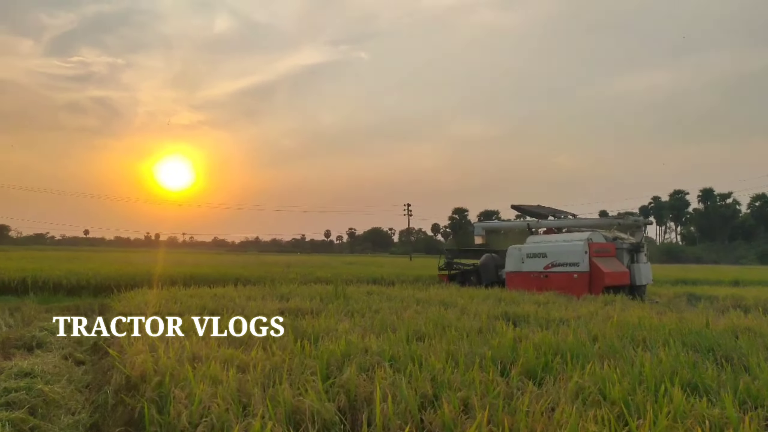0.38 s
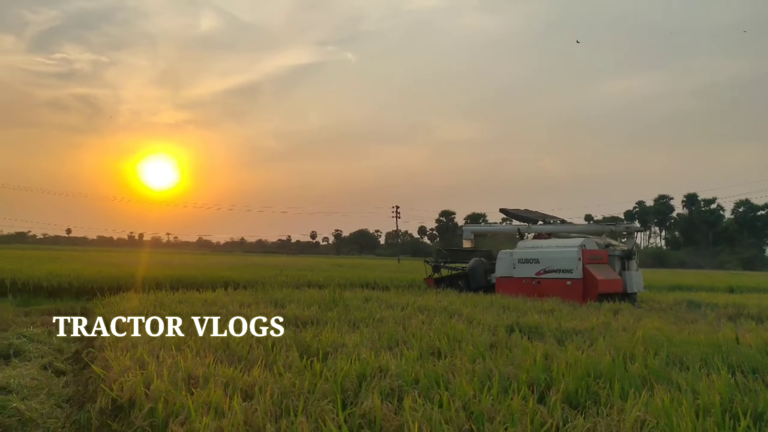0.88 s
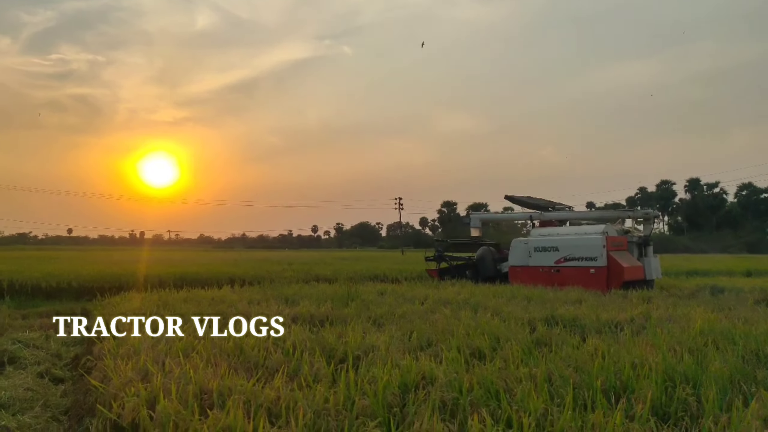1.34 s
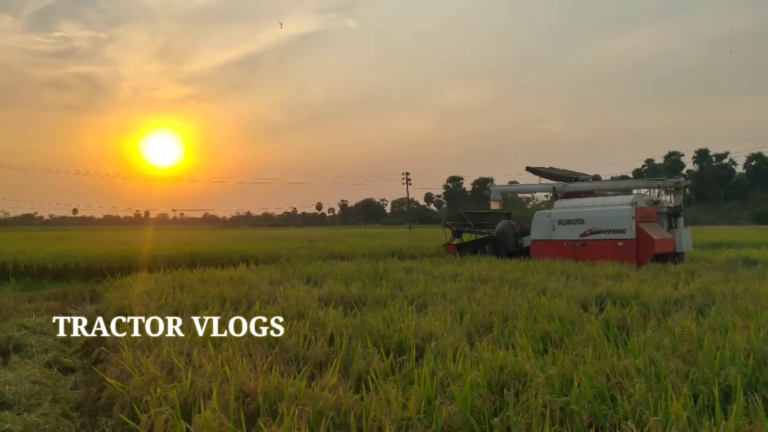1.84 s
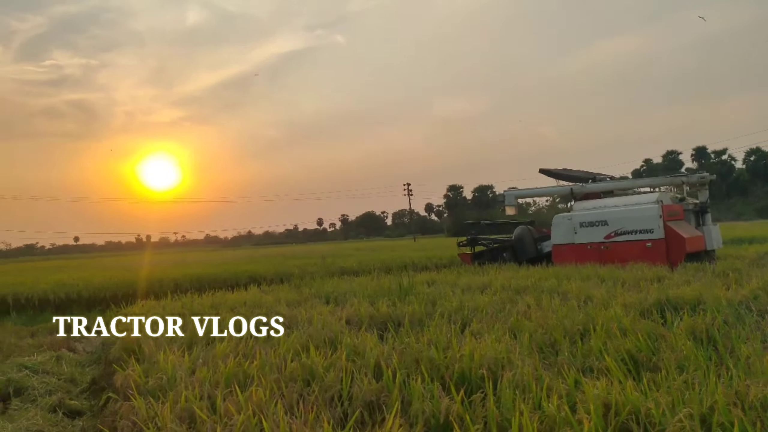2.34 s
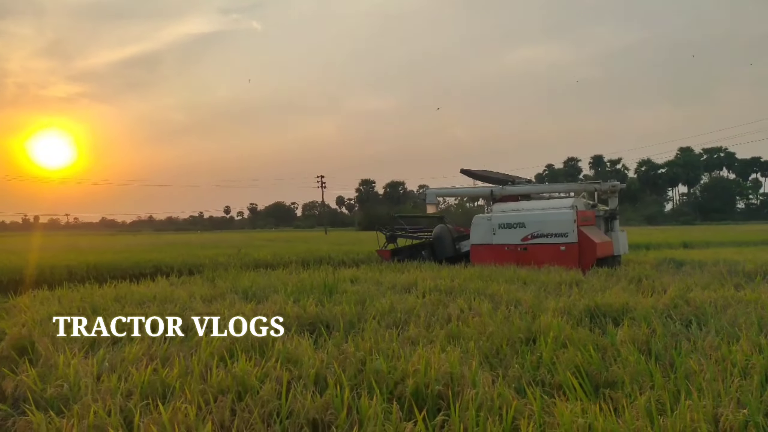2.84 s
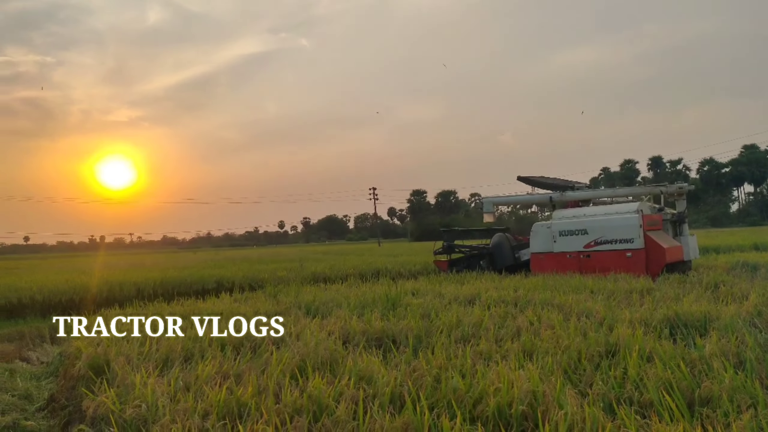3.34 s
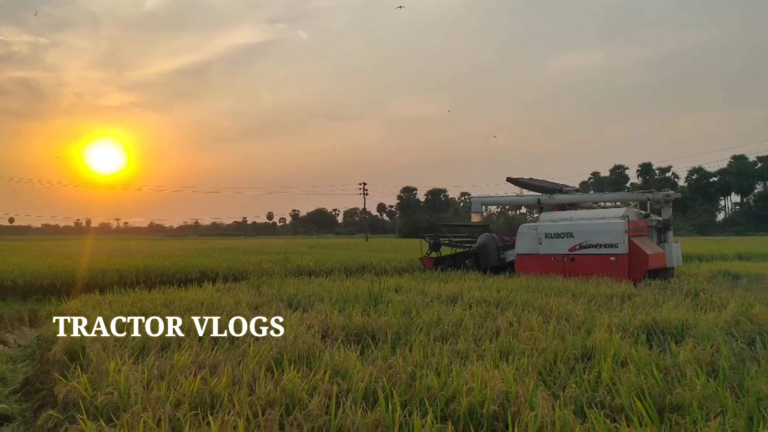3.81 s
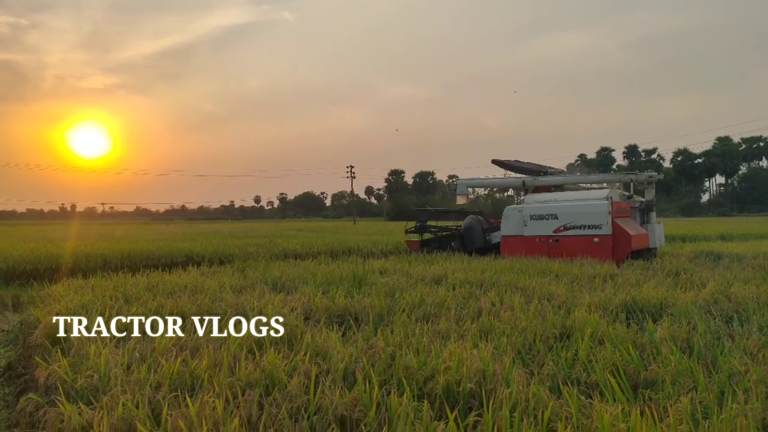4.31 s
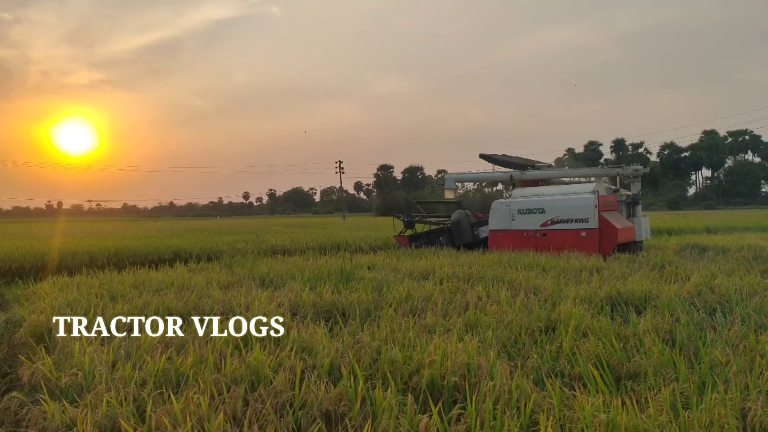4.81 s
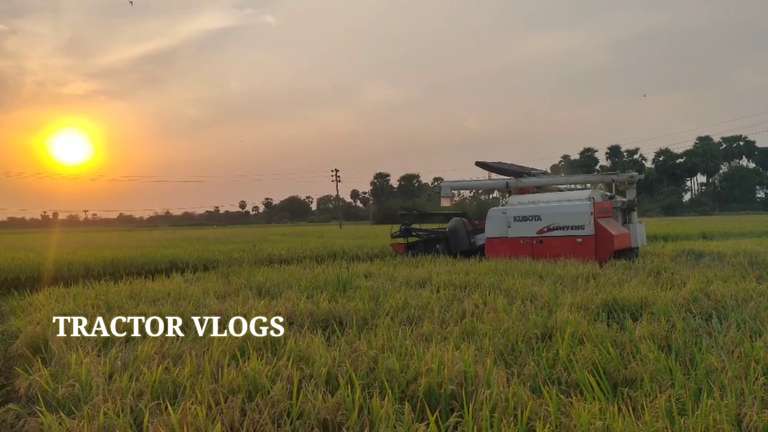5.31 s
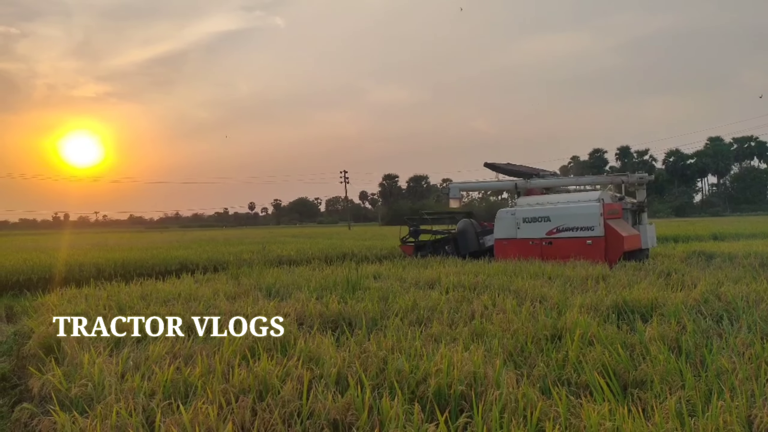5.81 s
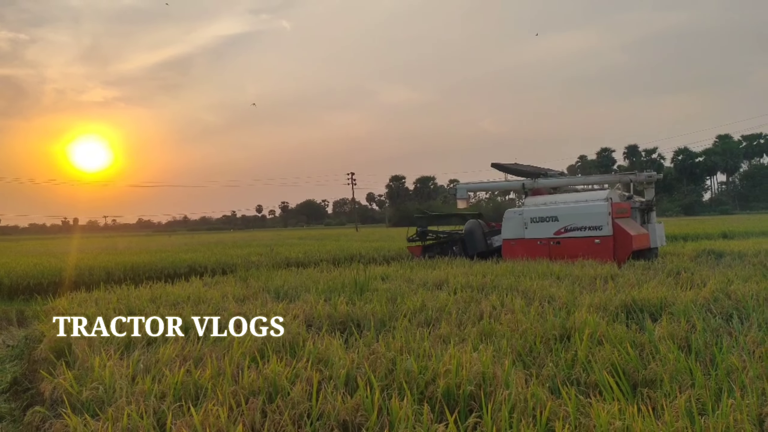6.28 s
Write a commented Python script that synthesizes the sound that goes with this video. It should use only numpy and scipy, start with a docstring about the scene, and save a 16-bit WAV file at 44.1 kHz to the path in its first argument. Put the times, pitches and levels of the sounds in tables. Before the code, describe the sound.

A combine harvester drones across a rice field, its low diesel hum beating and throbbing while dry chaff hisses on top, gradually growing fuller.

```python
"""The diesel of a tracked combine harvester, working a rice field some way off, picks up speed as it turns side-on.
Sums of cosines give its firing orders and those of the belt-driven threshing drum, so the two beat.
Shaped noise makes rumble, panel boom, drum roar, drone, fan, belt whir and buzz, throbbing with the knife;
noise spiked by ticks makes the blown chaff. Most noises reach two microphone ports directly and off the ground,
whose bounce combs the sound with slowly rising notches."""
import sys
import numpy as np
from scipy import signal
from scipy.fft import rfft, irfft, next_fast_len
from scipy.io import wavfile
from scipy.ndimage import uniform_filter1d, map_coordinates

SR = 44100
rng = np.random.default_rng(int(sys.argv[2]) if len(sys.argv) > 2 else 0)


def linear_from_db(decibels):
    """Turn decibels (scalar or array-like) into linear amplitude factors; 0 gives 1."""
    return 10 ** (np.asarray(decibels, float) / 20)


def materialize(psi):
    """Save the field psi as 16-bit PCM at rate SR to the path in sys.argv[1].

    A 1-D psi becomes a single channel; in a 2-D psi each row is a channel.
    """
    bounded = np.clip(np.atleast_2d(psi).T, -1, 1)
    quanta = np.round(bounded * 32767).astype(np.int16)
    wavfile.write(sys.argv[1], SR, quanta)


N = 282971

# Shaft speeds: start_s, firing_rate_hz, drum_lag_hz
SHAFT_SPEEDS = [(0, 92.4, 1.35), (.9, 92.5, 1.2), (1.3, 92.8, 1.0), (1.65, 94.7, 1.0), (1.95, 95.43, 1.15),
                (2.7, 95.43, 1.27), (6.42, 95.43, 1.31)]
OPPOSED_S = 4.24  # a moment when the fundamentals of drum and exhaust oppose, but for their wavering
# Exhaust orders: multiple of the firing rate, base_level_db (rms)
EXHAUST_ORDERS = [(1, -42), (2, -38), (3, -45), (4, -59)]
# Drum orders (beater, fan, two gears): multiple of the drum rate, base_level_db (rms)
DRUM_ORDERS = [(1, -36), (5, -52.5), (11, -61), (47 / 4, -58)]
# Added to the base levels: start_s, first_exhaust_db, second_exhaust_db, third_and_fourth_exhaust_db, drum_db
ORDER_CHANGES = [(0, -2, -15, -1, -15), (.3, 1.5, 5, -14, -15), (.5, 0, -11.5, -5, -13),
                 (.75, -7, 4, -7, -4), (.9, -1, -9, -6.5, -15.5), (1.15, -5, 3, -16, -5),
                 (1.35, -3, -13, -10.5, 0.5), (1.65, 0.5, 2, 2, -33), (1.9, -4.5, -5, -25, -6.5),
                 (2.15, -6, -5, 3.5, 2.5), (2.5, 1.5, -2.5, -3, -0.5), (3, -8.5, -1, -4.5, 2),
                 (3.4, -4, 3, 0.5, 1.5), (3.8, 2.5, -0.5, 0.5, -0.5), (4.6, 5.5, 0, 3.5, -1),
                 (5.3, 5, 0, 0.5, -2), (5.8, -2, 0, -4.5, 2), (6.42, 9, 2, 4, -4)]

# Slow levels before swells and throbs: start_s, rumble_db, roar_db, drone_db, fan_db, whir_db
MACHINE_LEVELS = [(0, -46, -41, -47, -46.5, -52), (.2, -41, -39, -52, -48.5, -52.5),
                  (.45, -35.5, -41.5, -44, -49, -53), (.7, -46, -40, -58, -46, -55.5),
                  (1, -40, -43, -53.5, -47.5, -49.5), (1.3, -35, -42.5, -47, -46.5, -52.5),
                  (1.65, -43, -42, -51.5, -46.5, -53), (2, -39, -41, -38.5, -45.5, -53),
                  (2.35, -36, -38.5, -42.5, -47, -52.5), (2.6, -35, -38.5, -39.5, -44.5, -51.5),
                  (2.9, -36, -42, -42, -46.5, -50.5), (3.25, -34, -39, -39, -45.5, -49.5),
                  (3.6, -34.5, -40.5, -40, -45.5, -48.5), (4.3, -34.5, -38, -42.5, -45.5, -50.5),
                  (4.8, -34.5, -38.5, -43.5, -43.5, -49), (5.7, -32, -37.5, -41.5, -44.5, -49),
                  (6.15, -38, -41.5, -46, -45.5, -53), (6.42, -34.5, -41.5, -46.5, -45.5, -52.5)]
# Panel boom and buzz before their throbs: start_s, level_db
BOOM_LEVELS = [(0.0, -47.5), (0.43, -40), (1.0, -54), (1.09, -40), (1.12, -44), (1.3, -32.5), (1.34, -46),
               (1.45, -45), (1.48, -30.5), (1.88, -48.5), (1.97, -36), (2.29, -44.5), (2.54, -33.5),
               (2.72, -45), (2.93, -31.5), (2.98, -52), (3.04, -42), (3.54, -34.5), (3.61, -48),
               (3.84, -34.5), (4.27, -43), (4.48, -30), (4.54, -43.5), (5.63, -38.5), (5.95, -44),
               (6.42, -47)]
BUZZ_LEVELS = [(0, -63), (.25, -68.5), (.8, -75), (1.5, -67), (2.3, -65.5), (3, -63.5), (3.7, -64.5),
               (4.4, -62.5), (5.1, -60), (5.8, -60.5), (6.42, -62)]
# The machine heaves, perhaps as wads of crop pass the drum: peak_s, rumble_swell_db, roar_swell_db
HEAVES = [(.4, -0.5, 2), (.72, 7, -1), (1.3, -1.5, -0.5), (1.5, 5, 2), (1.72, 5.5, 3.5), (2.1, 3, 3.5),
          (2.55, 0, 0.5), (2.898, 2.5, 5.5), (3.45, 0.5, -2), (3.7, -1, 1.5), (4, 1.5, -1), (4.15, 3, 1.5),
          (4.5, 3, 3), (4.92, 2, 2.5), (5.32, -1.5, 3.5), (5.6, -2, 1.5)]
HEAVE_SPREAD_S = 0.051  # standard deviation of a bell-shaped swell
KNIFE_HZ = 14.2  # mean stroke rate of the cutter knife

# Relative noise spectra of the machine: frequency_hz, density_db (per Hz)
RUMBLE_SPECTRUM = [(12, -51.5), (20, -22), (38, -29), (50, -21.5), (68, -10.5), (97, -5.5), (120, -2),
                   (150, -7), (175, -4), (190, -1.5), (209, -7.5), (228, -6.5), (245, -12), (270, -10.5),
                   (295, -9.5), (330, -11.5), (430, -34.5), (730, -120)]
BOOM_SPECTRUM = [(70, -120), (115, -26.5), (132, -6), (142, 1), (160, 4), (170, -1.5), (185, -23.5),
                 (300, -120)]
ROAR_SPECTRUM = [(200, -23.5), (290, -2), (340, -1.5), (400, -4.5), (450, -1), (510, -1.5), (600, -4),
                 (680, -16), (1000, -120)]
DRONE_SPECTRUM = [(400, -120), (520, -24), (600, -0.5), (660, 2.5), (740, -1), (810, -2.5), (900, -40.5),
                  (1200, -120)]
FAN_SPECTRUM = [(500, -120), (700, -12), (820, -9), (920, -4), (1030, -6), (1150, -9.5), (1300, -17.5),
                (1800, -120)]
WHIR_SPECTRUM = [(900, -120), (1150, -21.5), (1300, -1), (1700, -0.5), (2100, 0.5), (2400, -6.5),
                 (2550, -27), (3500, -120)]
BUZZ_SPECTRUM = [(1900, -120), (2300, -33), (2450, -4.5), (2550, 1.5), (2700, -3.5), (2850, -23),
                 (3500, -120)]

# Blown chaff before sieve throws and puffs: start_s, hiss_db, rattle_db, rustle_db
CHAFF_LEVELS = [(0, -53, -69.5, -63.5), (.3, -65.5, -77, -67), (.45, -58, -74, -61.5),
                (.62, -65.5, -71.5, -66.5), (.85, -58.5, -73.5, -65), (1.05, -56, -71, -59),
                (1.3, -54, -71.5, -62.5), (1.5, -55.5, -68, -66.5), (1.7, -55, -63.5, -59.5),
                (1.9, -57.5, -61.5, -58), (2.1, -54, -60, -59.5), (2.3, -51.5, -59.5, -54.5),
                (2.65, -56, -64, -60), (2.9, -53, -60.5, -55.5), (3.3, -55, -62, -56.5),
                (3.7, -52, -61.5, -58.5), (4.15, -55.5, -64, -57.5), (4.6, -54, -62.5, -57.5),
                (5.2, -53, -59.5, -55.5), (5.7, -55.5, -63.5, -58), (5.95, -60.5, -66, -63),
                (6.1, -57, -69, -61), (6.235, -68, -73, -63), (6.3, -68, -63.5, -64), (6.42, -65, -82, -65)]
# Added left-minus-right balance of the chaff: start_s, rattle_db, hiss_db, rustle_db
CHAFF_BALANCE = [(0, 5, -5, 11.5), (.5, 7.5, -6.5, 13.5), (1, 11, -7.5, 11.5), (1.55, 10, -6.5, 14.5),
                 (2.05, -1.5, -6, 2), (2.65, -2, -6.5, 5), (3, 0.5, -9.5, 2.5), (3.9, -1.5, -4, 2),
                 (4.15, 0.5, -2, 4), (4.6, 2, -7.5, 1.5), (6.42, -3, 1, 3)]
# The spread-out cloud blurs its bounce: start_s, sharp_share (factor on the bounce shares)
CHAFF_SHARPNESS = [(0, 1.05), (1.35, 1.05), (1.9, .45), (3.2, .5), (4.3, .9), (5.7, 1), (6.42, 1.15)]
# Louder puffs of dust: peak_s, peak_hiss_db
DUST_PUFFS = [(.157, -54.5), (0.399, -50), (.62, -62), (.78, -57), (.92, -56), (1.195, -60), (1.368, -54.5),
              (2.012, -52.5), (2.134, -51.5), (2.394, -52), (2.52, -52), (2.805, -52.5), (2.961, -56),
              (3.2, -58), (3.352, -52.5), (4.53, -54), (5.375, -55), (5.516, -51), (5.652, -55),
              (5.777, -51.5), (5.971, -57), (6.14, -54.5), (6.266, -51)]
PUFF_RISE_S, PUFF_FALL_S = 0.0084, 0.014  # time constants of a puff's power
PUFF_COARSE_DB = -18.5  # rattle and rustle of a puff relative to its hiss
SIEVE_HZ, SIEVE_PEAK_S = 5.9, 4.77  # shake rate of the sieve and the moment of one throw
# Relative noise spectra of the chaff: frequency_hz, density_db (per Hz)
RATTLE_SPECTRUM = [(2000, -120), (2550, -20.5), (2800, 1.5), (3100, -1.5), (3450, -2.5), (3800, -4.5),
                   (4300, -21), (6000, -120)]
RUSTLE_SPECTRUM = [(2600, -120), (3600, -32), (3850, -4), (4350, -1.5), (4800, -1.5), (5300, -2.5),
                   (5800, -5), (6400, -8), (6800, -30), (8000, -120)]
HISS_SPECTRUM = [(4000, -120), (5200, -30), (5600, -9.5), (6500, -1.5), (7060, 1.5), (7400, 4.5),
                 (7900, -10), (8050, -22.5), (8200, -40.5), (8600, -120)]

# Bounce before shares and sway: start_s, low_part_path_ms, low_part_strength (0-1),
# high_part_path_ms, high_part_strength (0-1), belt_strength (0-1, replaces the high one for high sources)
BOUNCE_PATHS = [(0, 1.82, .6, 2.3, .2, .6), (.45, 1.81, .7, 2.27, .3, .85), (.9, 1.78, .65, 2.15, .35, .8),
                (1.5, 1.62, .33, 2.0, .47, .85), (2.3, 1.5, 0, 1.91, .7, .85),
                (3.6, 1.15, 0, 1.82, .85, .9), (4.2, 1.1, .1, 1.67, .75, .85),
                (4.7, 1.1, .4, 1.63, .8, .85), (5.6, 1.09, .43, 1.61, .82, .87),
                (6.42, 1.08, .46, 1.59, 1, .95)]
# Path changes, one row for the left and one for the right port: low_part_ms, high_part_ms
BODY_PATH_CHANGE = [(0, 0), (.19, .19)]
RUSTLE_PATH_CHANGE = [(0, 0), (.25, .25)]
HISS_PATH_CHANGE = [(.2, .31), (.12, .29)]
COARSE_PATH_CAP_MS = 2.09  # caps the high bounce path of rattle and rustle before the port changes

# Port balance: frequency_hz, left_minus_right_db
PORT_BALANCE = [(250, 0), (700, 1), (1300, 1.5), (1900, 3.5), (2300, 6.5), (2600, 11), (3800, 1), (6400, 2),
                (7500, 0), (8100, -12)]
# Correlation of the ports before the bounces: frequency_hz, likeness (0-1)
PORT_LIKENESS = [(30, .99), (80, .9985), (160, .996), (400, .972), (1000, .91), (2000, .78), (4000, .5),
                 (8000, .5)]
# Phase between the ports: frequency_hz, left_lead_rad
PORT_LEAD = [(300, 0), (1000, -.3), (2240, -1.1), (3800, -4.1), (5000, -5.6), (8200, -8)]


def shafts():
    """Phase is the integral of frequency: the drum slips behind the firing rate on its belt."""
    firing_hz, lag_hz = curves(SHAFT_SPEEDS)
    firing = 2 * np.pi * np.cumsum(firing_hz) / SR
    slip = 2 * np.pi * np.cumsum(lag_hz) / SR
    slip_from_opposed = slip - slip[round(OPPOSED_S * SR)]
    return firing, firing - slip_from_opposed + np.pi


def hum(firing, drum):
    """Beats of two harmonic series: exhaust and drum orders, each wavering in the moving air."""
    first_db, second_db, upper_db, drum_db = curves(ORDER_CHANGES)
    exhaust_change_db = {1: first_db, 2: second_db}
    tones = 0

    def tone(phase, level_db, multiple):
        waver_db = min(multiple, 2) * (wobble(5) + .8 * wobble(11))  # overtones waver more
        return linear_from_db(level_db + waver_db) * np.sqrt(2) * np.cos(phase + .14 * wobble(8))

    for multiple, base_db in EXHAUST_ORDERS:
        phase = multiple * firing + .08 * multiple * wobble(9)
        tones = tones + tone(phase, base_db + exhaust_change_db.get(multiple, upper_db), multiple)
    for multiple, base_db in DRUM_ORDERS:
        tones = tones + tone(multiple * drum, base_db + drum_db, multiple)
    return tones


def machinery():
    """Amplitude modulation: knife strokes throb through every noise of the machine, heaves through most."""
    rumble_db, roar_db, drone_db, fan_db, whir_db = curves(MACHINE_LEVELS)
    heave_db, swell_db = heaves()
    knife_db = knife_throb()
    lumps_db = .9 * wobble(10) + knife_db
    low = rumble(rumble_db + heave_db, lumps_db) + panel_boom(knife_db)
    drum_noise = drum_roar(roar_db + swell_db, lumps_db) + drone(drone_db + 1.06 * swell_db, lumps_db)
    drum_noise = off_ground(drum_noise, left_share=0.64, right_share=0.35)
    blown = off_ground(fan(fan_db + 0.27 * swell_db, knife_db), left_share=1, right_share=.4)
    belts = belt_whir(whir_db + 0.16 * swell_db, knife_db)
    belts = off_ground(belts, left_share=1, right_share=.45, high_source=True)
    return low + drum_noise + blown + belts + buzz(knife_db)


def rumble(level_db, lumps_db):
    """Low-frequency radiation: tracks and drum rumble as patchy noise."""
    level_db = level_db + 0.59 * lumps_db + 0.23 * wobble(6.8)
    return linear_from_db(level_db) * at_ports(patches(depth_db=0.5), RUMBLE_SPECTRUM)


def panel_boom(knife_db):
    """Resonance: hollow panels boom in lumps as a narrow band of noise."""
    level_db = curves(BOOM_LEVELS)[0] + 1.9 * knife_db
    return linear_from_db(level_db) * at_ports(patches(depth_db=0.0), BOOM_SPECTRUM)


def drum_roar(level_db, lumps_db):
    """Broadband excitation of a housing: the drum roars in lumps."""
    level_db = level_db + lumps_db + 0.7 * wobble(13)
    return linear_from_db(level_db) * at_ports(patches(depth_db=0.67), ROAR_SPECTRUM, PORT_BALANCE)


def drone(level_db, lumps_db):
    """Source directivity: a band of noise that opens as the machine turns."""
    level_db = level_db + lumps_db + 0.42 * wobble(3.9)
    return linear_from_db(level_db) * at_ports(patches(depth_db=2.05), DRONE_SPECTRUM, PORT_BALANCE)


def fan(level_db, knife_db):
    """Flow noise: the fan blows as a band of patchy noise."""
    level_db = level_db + 0.68 * knife_db + 0.56 * wobble(8.7)
    return linear_from_db(level_db) * at_ports(patches(depth_db=1.14), FAN_SPECTRUM, PORT_BALANCE)


def belt_whir(level_db, knife_db):
    """Friction noise: the belts whir as a band of patchy noise."""
    level_db = level_db + .6 * knife_db + 0.49 * wobble(13)
    return linear_from_db(level_db) * at_ports(patches(depth_db=1.42), WHIR_SPECTRUM, PORT_BALANCE)


def buzz(knife_db):
    """Narrow-band vibration: a buzz, perhaps of the cutter bar, throbs with the knife."""
    level_db = curves(BUZZ_LEVELS)[0] + .6 * wobble(5.7) + 2.1 * knife_db
    return linear_from_db(level_db) * at_ports(patches(depth_db=0.7), BUZZ_SPECTRUM, PORT_BALANCE)


def knife_throb():
    """Periodic modulation in dB: the stroke, its half and its double; the knife runs a little unevenly."""
    stroke = 2 * np.pi * KNIFE_HZ * np.arange(N) / SR + 1.2 * wobble(2.11)
    return 0.66 * (np.cos(stroke) + 0.62 * np.cos(stroke / 2) + 0.81 * np.cos(2 * stroke))


def heaves():
    """Transient modulation: bell-shaped swells in dB, one curve for the rumble, one for the other noises."""
    peak_s, *swell_db = np.transpose(HEAVES)
    bells = np.exp(-.5 * ((np.arange(N) / SR - peak_s[:, None]) / HEAVE_SPREAD_S) ** 2)
    return np.array(swell_db) @ bells


def chaff():
    """Superposed impacts: clumps of straw and husks rattle and rustle over a hiss of finer dust."""
    hiss_db, rattle_db, rustle_db = curves(CHAFF_LEVELS)
    rattle_pan, hiss_pan, rustle_pan = curves(CHAFF_BALANCE)
    sharp, = curves(CHAFF_SHARPNESS)
    puff = puffs()
    sieve_db = 0.58 * np.cos(2 * np.pi * SIEVE_HZ * (np.arange(N) / SR - SIEVE_PEAK_S))  # shakes throw more
    clump_db = 1.1 * wobble(15) + 2.0 * wobble(35)

    def sides(pan_db):
        return linear_from_db(np.array([pan_db, -pan_db]) / 2)

    def coarse_gain(level_db):
        return np.sqrt(linear_from_db(2 * level_db) + linear_from_db(2 * PUFF_COARSE_DB) * puff)

    rattle = at_ports(spray(clump_db, depth=.5), RATTLE_SPECTRUM)
    rattle = coarse_gain(rattle_db) * sides(rattle_pan) * rattle
    rattle = off_ground(rattle, left_share=(1 + sharp) / 2, right_share=.45 * sharp,
                        high_source=True, longest_ms=COARSE_PATH_CAP_MS)

    # The finer sounds come from the cloud behind the machine, so they bounce by other paths.
    rustle = at_ports(spray(clump_db, depth=0.55), RUSTLE_SPECTRUM)
    rustle = coarse_gain(rustle_db + 0.97 * sieve_db) * sides(rustle_pan) * rustle
    rustle = off_ground(rustle, left_share=.65 * sharp, right_share=.75 * sharp,
                        extras_ms=RUSTLE_PATH_CHANGE, high_source=True, longest_ms=COARSE_PATH_CAP_MS)

    hiss = at_ports(spray(clump_db, depth=0.69), HISS_SPECTRUM, PORT_BALANCE)
    hiss = np.sqrt(linear_from_db(2 * (hiss_db + sieve_db)) + puff) * sides(hiss_pan) * hiss
    hiss = off_ground(hiss, left_share=.75 * sharp, right_share=.85 * sharp, extras_ms=HISS_PATH_CHANGE)
    return rattle + rustle + hiss


def spray(clump_db, depth):
    """Shot noise: random ticks, denser in clumps, add power that dies in a few ms to a steady noise."""
    struck = rng.random(N) < 160 / SR * linear_from_db(clump_db)  # about 160 ticks a second, more in a clump
    ticks = struck * linear_from_db(5.8 * np.minimum(rng.exponential(size=N), 4))
    decay = np.exp(-np.arange(SR // 20) / SR / 0.0061)  # time constant in s
    dying = np.convolve(ticks, decay)[:N]
    envelope = np.sqrt(linear_from_db(depth * clump_db) + depth * 0.49 * dying)
    return unit(envelope) * rng.standard_normal((2, N))


def puffs():
    """Growth and decay: the power of each puff rises fast and thins out exponentially."""
    peak_s, peak_db = np.transpose(DUST_PUFFS)
    age_s = np.clip(np.arange(N) / SR - peak_s[:, None] + PUFF_RISE_S, 0, None)
    shape = (1 - np.exp(-age_s / PUFF_RISE_S)) * np.exp(-age_s / PUFF_FALL_S)
    return linear_from_db(2 * peak_db) @ (shape / shape.max())


def off_ground(x, left_share, right_share, extras_ms=BODY_PATH_CHANGE, high_source=False, longest_ms=np.inf):
    """Comb filtering: bounces off the crop come later by shortening paths; power is about kept."""
    low_ms, low, high_ms, high, belt = curves(BOUNCE_PATHS)
    if high_source:  # belts run high on the machine
        low, high = .75 * low, belt
    high_ms = np.minimum(high_ms, longest_ms)

    def late(port, delay_ms):
        return map_coordinates(port, [np.arange(N) - delay_ms * SR / 1000], mode="nearest")

    out = []
    for port, share, (low_extra, high_extra) in zip(x, (left_share, right_share), extras_ms):
        sway = np.clip(1 + .2 * wobble(6), 0, 1.2)  # the crop moves, so the bounce comes and goes
        wander_ms = .012 * wobble(5)
        low_gain, high_gain = share * sway * low, share * sway * high
        low_bounce = low_gain * late(port, low_ms + low_extra)
        high_bounce = high_gain * late(port, high_ms + high_extra + wander_ms)
        out.append((port + low_bounce + high_bounce) / np.sqrt(1 + low_gain ** 2 + high_gain ** 2))
    return np.array(out)


def at_ports(excitation, spectrum, balance=((1, 0),)):
    """Interchannel coherence: two unrelated noises, coloured, mixed, balanced and lagged; mid rms 1."""
    def mid_side(hz):
        angle = np.arccos(np.clip(along(PORT_LIKENESS, hz), 0, 1)) / 2
        return linear_from_db(along(spectrum, hz)) * np.array([np.cos(angle), np.sin(angle)])

    def left_right(hz):
        # Each port takes half of the level difference and half of the phase lead.
        half = linear_from_db(along(balance, hz) / 2) * np.exp(.5j * along(PORT_LEAD, hz))
        return np.array([half, 1 / half])

    mid, side = filtered(excitation, mid_side)
    pair = filtered(np.array([mid + side, mid - side]), left_right)
    return pair / np.std(pair.mean(axis=0))


def patches(depth_db):
    """Nonstationary noise: two white noises share a slowly shifting field of louder and softer patches."""
    z = signal.stft(rng.standard_normal((2, N)), nperseg=1024)[2]
    field = rng.standard_normal(z.shape[1:])
    field = uniform_filter1d(field, size=4, axis=0)  # across frequency
    field = uniform_filter1d(field, size=8, axis=1)  # across time
    return signal.istft(z * linear_from_db(depth_db * unit(field)), nperseg=1024)[1][:, :N]


def filtered(x, response):
    """Linear filtering: the spectrum of x times a complex response of frequency."""
    m = next_fast_len(N + 8192)
    return irfft(rfft(x, m) * response(np.fft.rfftfreq(m, 1 / SR)), m)[..., :N]


def wobble(rate):
    """Band-limited fluctuation: a smooth random curve with rate knots a second."""
    knots = rng.standard_normal(int(N * rate / SR) + 4)
    return map_coordinates(knots, [np.arange(N) * rate / SR])


def curves(rows):
    """Linear interpolation in time: one value per sample for each column after the first."""
    s, *columns = np.transpose(rows)
    return [np.interp(np.arange(N) / SR, s, column) for column in columns]


def along(points, hz):
    """Interpolation on a logarithmic frequency axis."""
    f, value = np.transpose(points)
    return np.interp(np.log(hz + 1), np.log(f + 1), value)


def unit(x):
    """Normalization to an rms of 1."""
    return x / np.sqrt(np.mean(x ** 2) + 1e-20)


def scene():
    """Superposition: the tones, alike at both ports, add to the noises of machine and chaff."""
    firing, drum = shafts()
    return hum(firing, drum) + machinery() + chaff()


def band_limit(x):
    """A steep low-pass at the top of the band."""
    return signal.sosfilt(signal.butter(12, 8870, fs=SR, output="sos"), x)


def record(dry):
    """Two-port pickup: the port signals are already the finished mix."""
    return band_limit(dry)


dry = scene()
out = record(dry)
materialize(out)
```